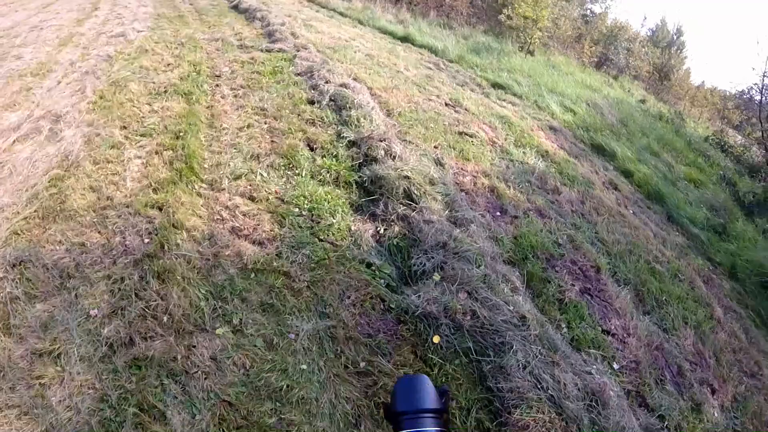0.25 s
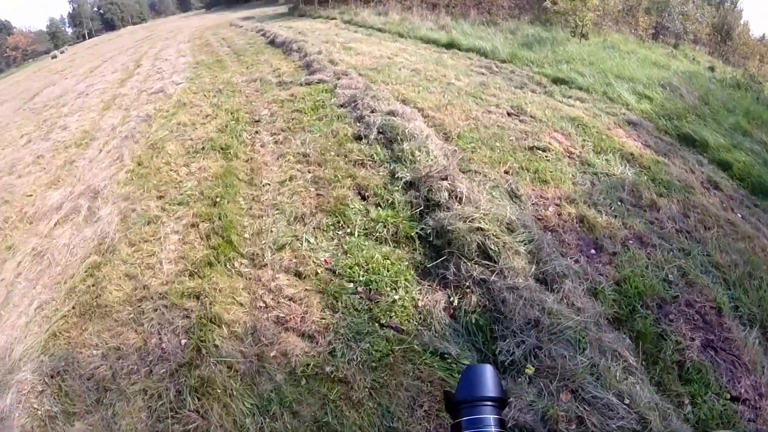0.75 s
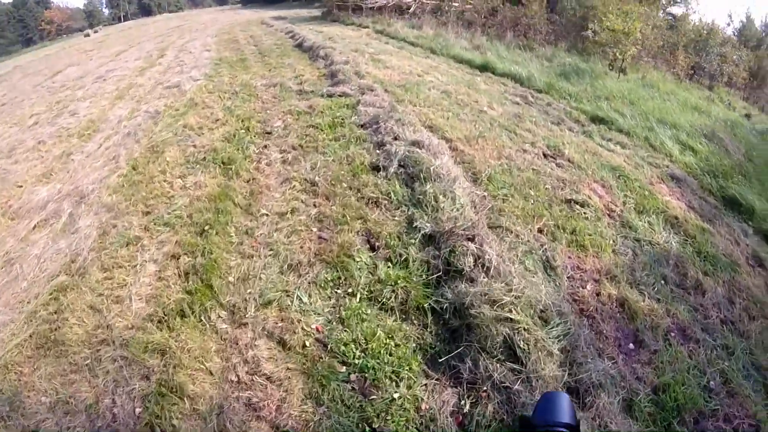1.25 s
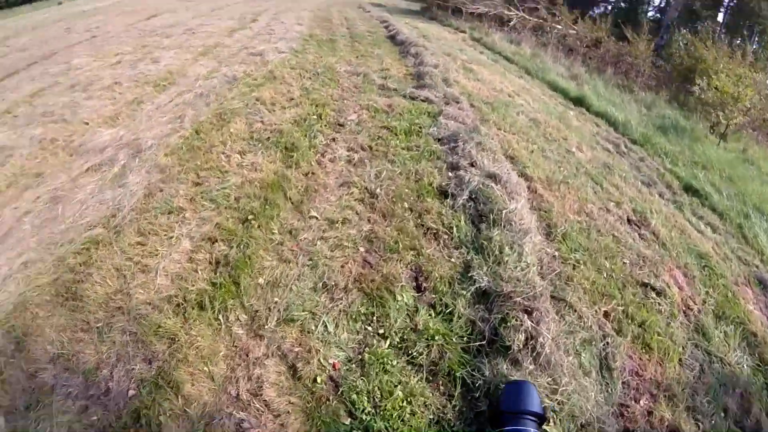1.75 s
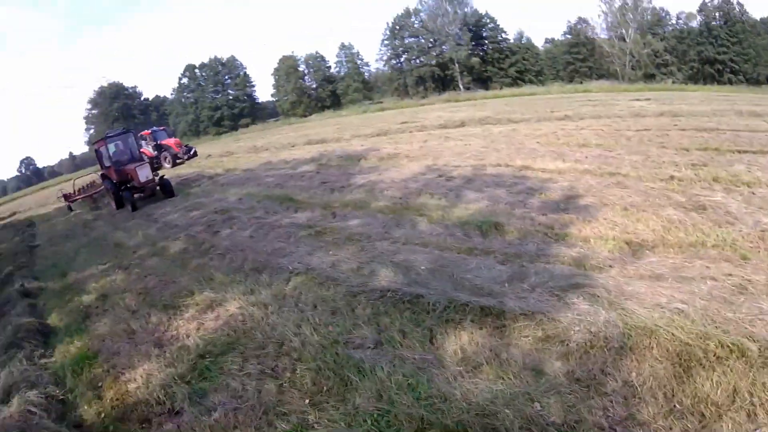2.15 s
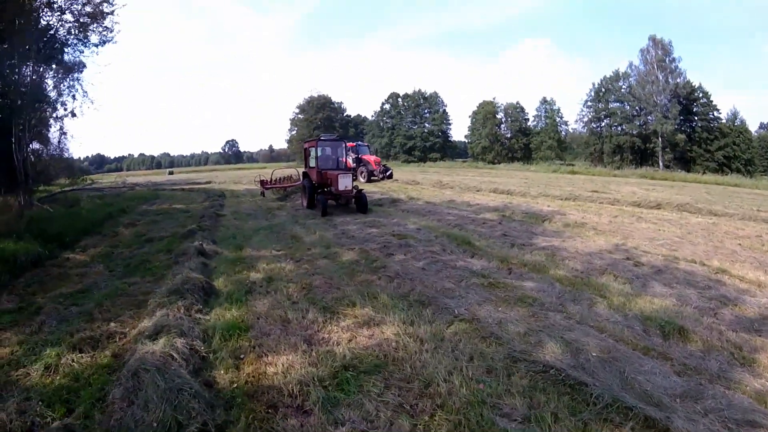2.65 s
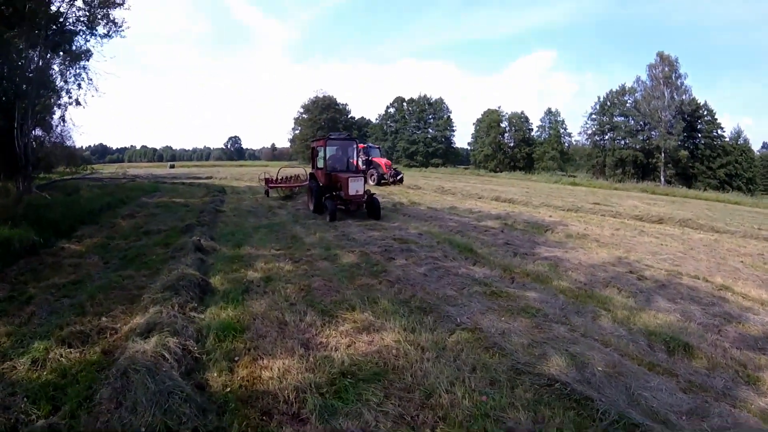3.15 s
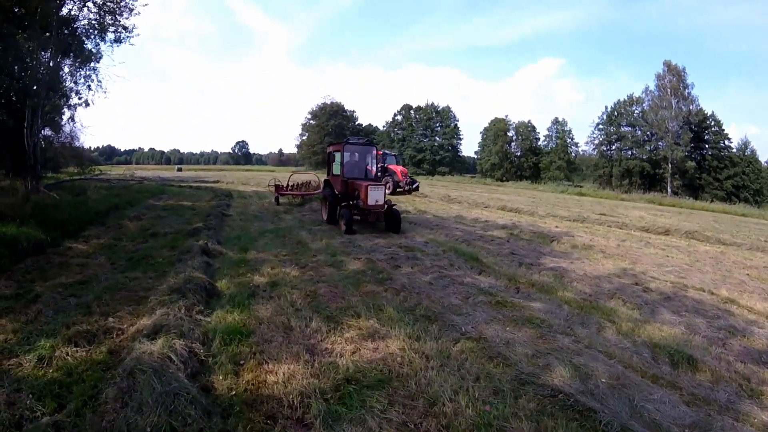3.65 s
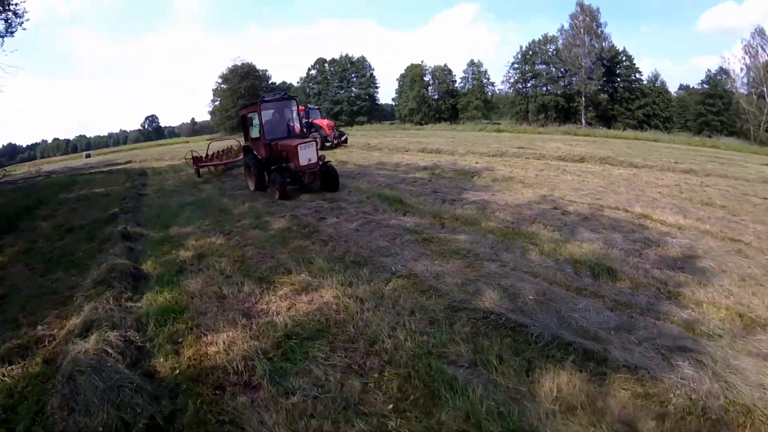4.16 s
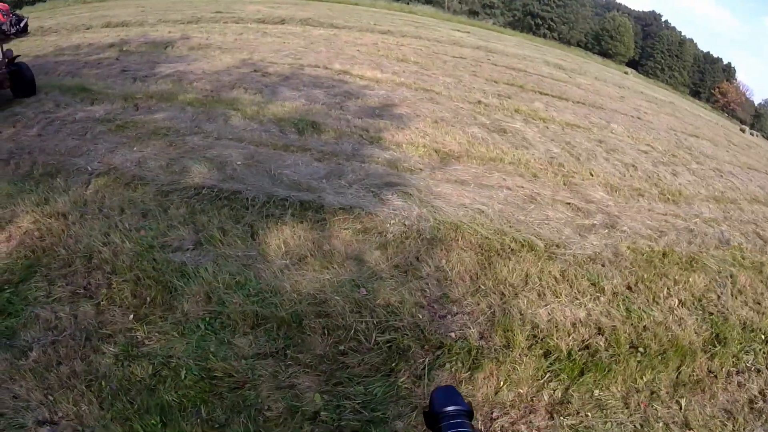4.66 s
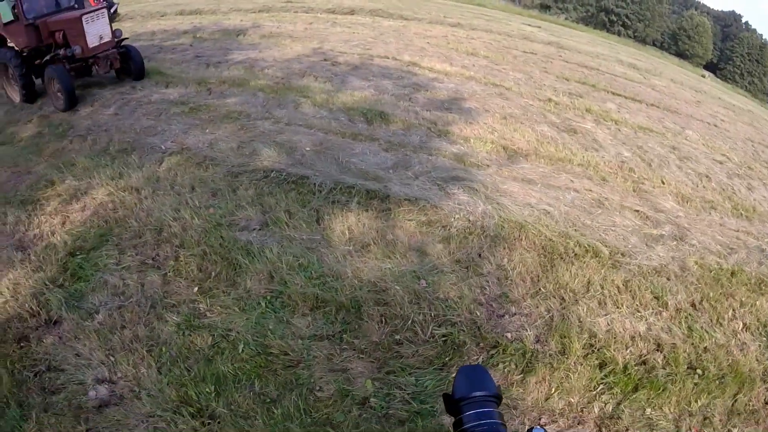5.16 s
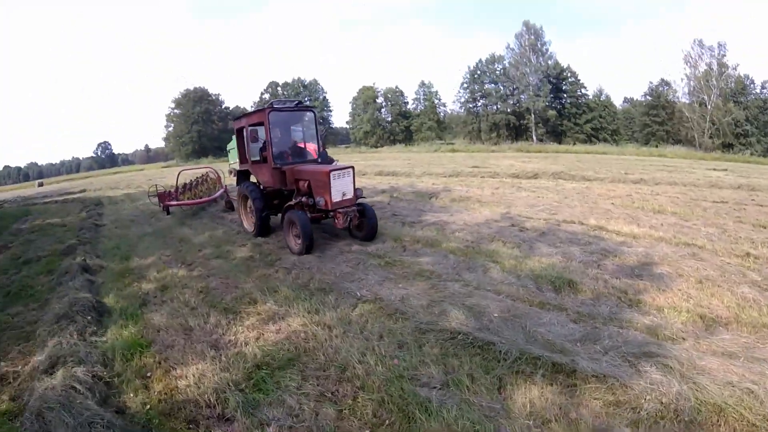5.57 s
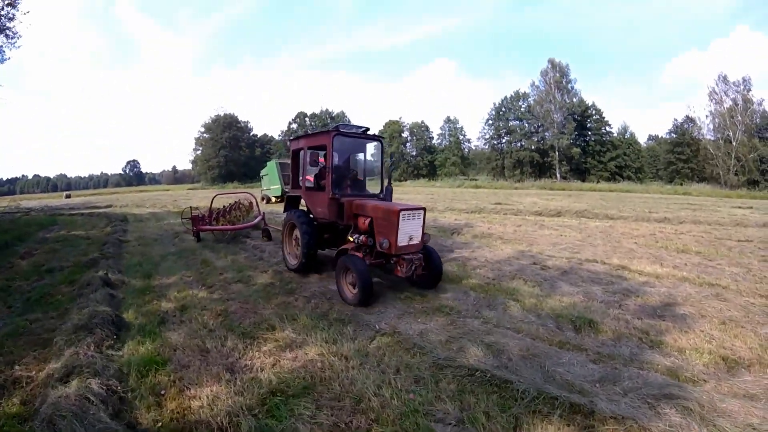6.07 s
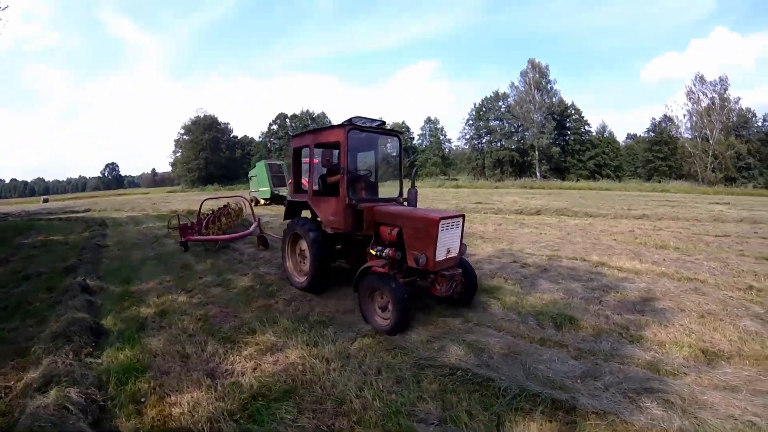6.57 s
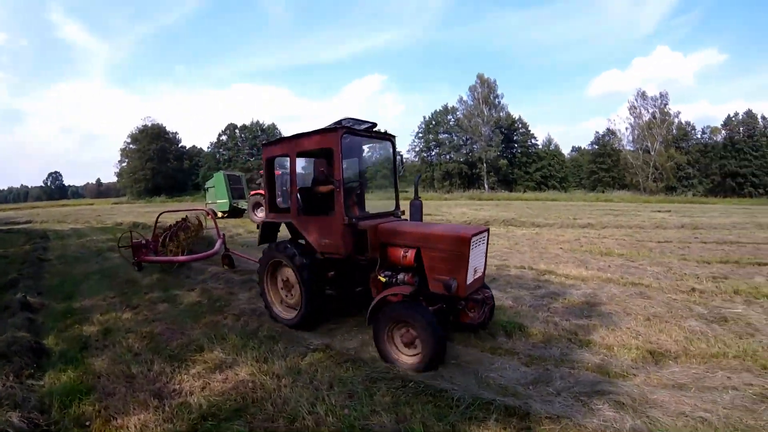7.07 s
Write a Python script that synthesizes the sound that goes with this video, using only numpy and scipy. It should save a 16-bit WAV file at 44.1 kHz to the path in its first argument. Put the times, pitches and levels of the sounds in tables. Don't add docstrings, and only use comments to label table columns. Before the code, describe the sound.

Lumpy, rattling diesel chug grows louder in an open hayfield, under low wind thumps and a few faint hisses of raked hay.

```python
import sys
import numpy as np
from scipy import signal
from scipy.fft import rfft, irfft, next_fast_len
from scipy.io import wavfile
from scipy.ndimage import uniform_filter1d

SR = 44100
rng = np.random.default_rng(int(sys.argv[2]) if len(sys.argv) > 2 else 0)


def to_wav(sig):
    pcm = np.clip(np.atleast_2d(sig), -1, 1) * 32767
    pcm = np.round(pcm).astype(np.int16)
    wavfile.write(sys.argv[1], SR, pcm.T)


def how_loud(loudness_db):
    steps = np.asarray(loudness_db, float) / 20
    return 10 ** steps


N = 322795

# pitch_hz, width_hz, level_db
BLOCK_MODES = [(657, 665, -6.5), (774.5, 39, 6), (793, 160, 3), (1045, 450, -7.5)]
# pitch_hz, width_hz, level_db
HEAD_MODES = [(800, 238, -8.5), (1042, 124, 2), (1138.5, 186, -1.5), (1350, 164, -8.5), (1496, 290, -19.5)]
# pitch_hz, density_db
PANEL_SPECTRUM = [(1200, -13.5), (1400, -8), (1600, -4), (2000, -3.5), (2350, -3.5), (2720, -9), (3100, -7),
                  (3600, -7), (4000, -10.5), (4350, -18.5), (4800, -36.5)]
# pitch_hz, density_db
TICK_SPECTRUM = [(4300, -6.5), (4900, -6), (5450, -2), (5900, 0), (6400, -3.5), (7000, -1.5), (7600, -8.5),
                 (8500, -8.5), (10000, -12), (13000, -14), (14700, -22.5)]
# place_in_cycle (0-1), level_db
EXHAUST_BLOWS = [
    (0.041, 10.5),
    (0.272, 21.5),
    (0.512, -3),
    (.77, -20),
]
# pitch_hz, width_hz, level_db
PIPE_MODES = [(38, 21.7, 5.5), (76, 9.8, 8.5), (113.4, 7.7, -3), (154, 120, -19.5)]
# time_s, level_db
EXHAUST_LEVEL = [(0, -24), (2, -34), (3.5, -23), (5, -48), (7.32, -36)]


def engine():
    block_db, panel_db, tick_db = heard_db()
    steep = signal.butter(3, [420, 1480], "band", fs=SR, output="sos")

    chatter = clatter(2, 0.00074, 0.0044, 0.039, 0.063, 2.1, 900, hard_db=-27, snap=0)
    whirr = ring(signal.sosfilt(steep, chatter), BLOCK_MODES)
    knock = clatter(1, .005, .007, .05, .3, 1.6, 900, hard_db=-9, snap=8)
    head = ring(signal.sosfilt(steep, knock), HEAD_MODES)
    block = evened(whirr + how_loud(-2.0) * head)

    rattle = clatter(2, .005, .008, .05, .4, 3.0, 2000, hard_db=-14, snap=3)
    ticks = clatter(3, .006, .008, .04, .35, 3.0, 3500, hard_db=-16, snap=1)
    exhaust = ring(strikes(*np.transpose(EXHAUST_BLOWS), spread_db=1.5, jitter_s=.0012), PIPE_MODES)
    exhaust = exhaust * how_loud(columns(EXHAUST_LEVEL)[0])

    sound = how_loud(block_db) * block
    sound = sound + how_loud(panel_db) * colour(rattle, PANEL_SPECTRUM)
    sound = sound + how_loud(tick_db - 0.04) * colour(ticks, TICK_SPECTRUM)
    return sound + exhaust


# place_in_cycle (0-1), knock_db, rattle_db, tick_db
FIRING_STROKES = [
    (-.09, 11.5, 3, 2),
    (.18, 7.5, 3, 6),
    (.44, -4, -9, -6),
]
# time_s, level_db, sharpness_db
HARD_KNOCKS = [(0.149, -29, 12), (2.625, -10.5, -21), (3.189, -6, -10), (3.866, -17.5, -5),
               (4.201, -8.5, -1.5), (4.317, 0, -8), (4.541, -1.5, -7), (4.652, -10, 3), (4.875, -0.5, -0.5),
               (5.423, -5, -3.5), (5.97, -4.5, -8.5), (6.085, -7, -7.5), (6.306, -6.5, -5),
               (6.41, -27.5, -4), (6.505, -19, 2), (6.617, -2, -4), (6.718, -3.5, -5), (6.755, -18.5, 11),
               (6.826, -11, -3.5), (7.028, -1, 3), (7.145, -2.5, -5), (7.287, -20.5, -8)]
# level_db against the knock, share of sharpness
HARD_SHARES = [(3, 0.0), (-18, 1.0), (-32.5, 0.12)]


def clatter(layer, rise_s, quick_s, slow_s, slow_share, grain_db, grains_per_s, hard_db, snap):
    t = np.arange(SR // 4) / SR
    decay = np.exp(-t / quick_s) + slow_share * np.exp(-t / slow_s)
    flare = (1 - np.exp(-t / rise_s)) * decay

    firings = np.transpose(FIRING_STROKES)
    hits = strikes(firings[0], firings[layer], spread_db=3.5, jitter_s=.0015)
    level_db = heard_db()[layer - 1]
    s, db, sharp_db = np.transpose(HARD_KNOCKS)
    part_db, share = HARD_SHARES[layer - 1]
    hard = ((s - .005) * SR).astype(int)
    hits[hard] += how_loud(db + part_db + share * sharp_db - level_db[hard] + hard_db)

    shape = 1 + signal.oaconvolve(hits, flare)[:N]
    struck = rng.random(N) < grains_per_s / SR
    grains = struck * rng.standard_normal(N) * how_loud(grain_db * rng.exponential(1, N).clip(0, 3))
    blow = snap * np.roll(hits, round(rise_s * SR))
    return shape * (rng.standard_normal(N) + 0.62 * evened(grains)) + blow


# time_s, speed_cycles_per_s
CRANK_SPEED = [(0, 9.487), (.7, 9.27), (1.4, 8.572), (2, 8.681), (3, 8.819), (4.2, 8.913), (5.4, 9.088),
               (6.2, 9.238), (7.32, 9.548)]
LUCK = rng.standard_normal((4, 70, 2))


def strikes(places, dbs, spread_db, jitter_s):
    s = np.arange(N) / SR
    turned = -1.45 + np.cumsum(columns(CRANK_SPEED)[0]) / SR
    out = np.zeros(N)
    for place, db, luck in zip(places, dbs, LUCK):
        at = np.interp(np.arange(70) - 2 + place, turned, s, -1, 99) + jitter_s * luck[:, 0]
        inside = (at > 0) & (at < (N - 1) / SR)
        out[(at[inside] * SR).astype(int)] += how_loud(db + spread_db * luck[inside, 1])
    return out


# time_s, loudness_db, treble_brightness_db
APPROACH = [(0, -31.5, 0.5), (.35, -32, -2), (1.35, -31.5, 0), (2.05, -32.5, 0.5), (2.4, -28.5, -3),
            (2.75, -26, -3.5), (3.45, -25, -3.5), (4.15, -25.5, -3.5), (4.85, -26.5, -2.5), (5.55, -25, -3),
            (5.85, -30, -2), (6.25, -24.5, -3), (6.6, -21.5, -2), (7.32, -25.5, 0.5)]
# level_db at mean loudness, share of loudness, share of brightness
PART_LEVELS = [(-26.5, 0.89, 0.17), (-43.5, 0.68, 1.6), (-50, 0.53, 0.62)]


def heard_db():
    loud_db, bright_db = columns(APPROACH)
    mean_db = -27
    return [db + share * (loud_db - mean_db) + bright_share * bright_db for db, share, bright_share in PART_LEVELS]


# start_s, level_db, t60_s
RAKE_SWISHES = [
    (3.053, -38, 0.49),
    (3.111, -50, 0.32),
    (4.2, -50, 0.81),
    (4.341, -44, 0.13),
    (4.9, -38.5, 0.081),
    (5.232, -42.5, 0.12),
]
# pitch_hz, density_db
HAY_SPECTRUM = [(1940, -25), (3300, -20), (3980, -8), (4450, -23), (4700, -16), (6130, -7.5), (7090, -12),
                (8420, -18.5), (10900, -39), (18500, -120)]


def rake():
    t = np.arange(N) / SR
    level = np.zeros(N)
    for s, db, t60 in RAKE_SWISHES:
        onset = ((t - s) / 0.0011).clip(0, 1)
        level += how_loud(db - 60 * (t - s).clip(0) / t60) * onset
    return level * how_loud(2.2 * flutter(60)) * colour(rng.standard_normal(N), HAY_SPECTRUM)


# pitch_hz, density_db
RUMBLE_SPECTRUM = [(8, 11), (20, -0.5), (40, 10), (65, 0.5), (90, -21), (130, -52)]
# pitch_hz, density_db
BUFFET_SPECTRUM = [(40, -43), (62, 0), (85, 1.5), (120, -3.5), (180, -11.5), (240, -23), (320, -52)]
# pitch_hz, density_db
ROAR_SPECTRUM = [(130, -9), (185, 1), (230, 0.5), (330, -2.5), (480, -7), (620, -11), (900, -28)]


def wind():
    spectra = (RUMBLE_SPECTRUM, BUFFET_SPECTRUM, ROAR_SPECTRUM)
    gusts = zip(gust_db(), spectra, (.5, .8, 1.1), (.06, .04, .03))
    lumps = flutter(13.0)
    air = np.zeros(N)
    for db, spectrum, lump_db, span_s in gusts:
        eddies = steadied(colour(rng.standard_normal(N), spectrum), span_s)
        air += how_loud(db + lump_db * lumps) * eddies
    return air + .3 * (air ** 2 - uniform_filter1d(air ** 2, 4000))


# time_s, level_db, reach_db (how far the eddies climb in pitch)
BREEZE = [(0, -13.5, -7.5), (.2, -23, 0), (.55, -23.5, 5.5), (.95, -20.5, -4), (1.35, -25, 1),
          (1.65, -18.5, -0.5), (2.05, -26.5, 2.5), (2.14, -16, 4.5), (2.45, -19.5, 4), (3.2, -15.5, 1),
          (3.95, -23, 3), (4.4, -17, 4.5), (4.85, -17.5, 3.5), (5.25, -17, 4), (5.9, -18.5, 5),
          (6.4, -17, 7), (6.7, -15, 7), (7.25, -16.5, 10)]
# time_s, level_db, length_s, reach_db
SINGLE_GUSTS = [(0.031, -21, 0.023, 13), (0.07, -0.5, 0.016, 1.5), (0.12, -10, 0.053, 10.5),
                (1.03, 8, .02, 1), (1.175, 5.5, 0.028, -3), (1.77, 5.5, 0.015, -11), (2.09, 6, 0.036, -10),
                (2.305, 1.5, 0.11, 4), (2.764, 2, .03, -0.5), (2.844, -4.5, 0.044, 2),
                (2.963, 3.5, 0.041, -1.5), (4.153, 8, 0.017, -7), (4.228, 7.5, 0.0067, -1.5),
                (4.43, 2.5, 0.12, -3), (4.98, 7, 0.054, 1), (5.413, 3, 0.11, 5.5), (5.724, 9, 0.077, -1.5),
                (6.637, -0.5, 0.062, 2.5), (7.32, 2.5, 0.053, 4)]
# level_db over the breeze, share of reach
EDDY_LEVELS = [(0, -0.41), (-5, 0.44), (-18, 1.09)]


def gust_db():
    t = np.arange(N) / SR
    level_db, reach_db = columns(BREEZE)
    for s, db, length, reach in SINGLE_GUSTS:
        bump = np.exp(-((t - s) / length) ** 2)
        level_db, reach_db = level_db + db * bump, reach_db + reach * bump
    return [level_db + db + share * reach_db + 2.5 * flutter(9.1) for db, share in EDDY_LEVELS]


def steadied(x, span_s):
    return evened(x / (uniform_filter1d(x ** 2, int(span_s * SR)) + 0.055) ** 0.33)


def evened(x):
    return x / np.sqrt(np.mean(x ** 2) + 1e-20)


def columns(rows):
    s, *values = np.transpose(rows)
    return [np.interp(np.arange(N) / SR, s, v) for v in values]


def across(points, size):
    hz, value = np.transpose(points)
    return np.interp(np.log(np.fft.rfftfreq(size, 1 / SR) + 1), np.log(hz + 1), value)


def colour(x, points):
    closed = [(points[0][0] * .8, -90)] + list(points) + [(points[-1][0] * 1.2, -90)]
    size = next_fast_len(N)
    return evened(irfft(rfft(x, size) * how_loud(across(closed, size)), size)[:N])


def ring(x, modes):
    out = np.zeros(N)
    for k, (hz, width, db) in enumerate(modes):
        pole = np.exp((2j * np.pi * hz - np.pi * width) / SR)
        out += (-1) ** k * how_loud(db) * signal.lfilter([1 - abs(pole)], [1, -pole], x).real
    return evened(out)


def flutter(hz):
    return evened(signal.lfilter(*signal.butter(2, hz, fs=SR), rng.standard_normal(N)))


# pitch_hz, share
PORT_LEAN = [(100, 0.094), (250, 0.2), (530, 0.6), (900, 1.35), (1600, 1.7), (4600, 2.0), (9000, 1.5)]


def scene():
    mid = engine() + wind() + rake()
    size = next_fast_len(N)
    lean = irfft(rfft(mid, size) * across(PORT_LEAN, size), size)[:N]
    side = lean * np.tanh(-0.87 * np.log(10) / 40)
    return np.array([mid + side, mid - side])


# pitch_hz, level_db, share of the limit's unrest
TREBLE_LIMIT = [(2000, -39, 0.18), (3000, -26, 0.44), (4080, -29.5, 1), (6200, -28.5, 1), (6400, -33, 0.98),
                (8330, -17, 0.69), (8700, -16.5, 0.76), (11200, -15.5, 0.95), (15000, -17, 0.99)]
# centre_s, length_s, limit_shift_db
THIN_SPELLS = [(0.037, .06, -2), (.37, .05, -10), (.56, .05, 10), (.965, .03, 18), (1.62, .12, 6),
               (2.033, .05, -8), (2.2, .04, 16), (2.856, .07, -5), (2.96, .05, 15), (3.275, .05, 13),
               (3.45, .03, 13), (3.542, .024, 10), (4.41, .05, 19), (4.505, .05, 19), (4.57, .04, -12),
               (4.715, .05, 13), (4.776, .06, -11), (4.905, .04, -18), (5.168, .04, 22.5), (5.218, .04, -9),
               (5.31, .07, 9), (5.48, .05, 17), (5.619, .16, -10), (5.725, .024, 12), (5.782, .04, -8),
               (5.84, .07, 16), (6.05, .024, 13), (6.11, .04, -11), (6.39, .05, 17), (6.767, .04, -14)]
# pitch_hz, odds_sigma
SIDE_SURVIVAL = [(150, -1.5), (450, 1.0), (1000, 3), (2200, 0.5), (3600, .2), (4500, -.6), (6000, 0.3),
                 (8000, -1.3)]


def thin_treble(x):
    window = np.sin(np.pi / 2 * np.sin(np.pi * (np.arange(2048) + .5) / 2048) ** 2)
    lead = 2048 - 559
    hz, t, z = signal.stft(np.pad(x, ((0, 0), (lead, 0))), SR, window, 2048, 1024, boundary=None)
    t, power = t - lead / SR, abs(z.mean(0)) ** 2

    limit_hz, *values = np.transpose(TREBLE_LIMIT)
    keep_db, share = (np.interp(hz, limit_hz, v)[:, None] for v in values)
    loud_db = 10 * np.log10(power.sum(0) + 1e-9)
    restless_db = 3.4 * rng.standard_normal(len(t)) + 0.59 * (loud_db + 22.5)
    per_band_db = 5.7 * np.repeat(rng.standard_normal((len(t), 43)).T, 24, 0)[:len(hz)]
    short_db = sum(db * (abs(t - s) < length / 2) for s, length, db in THIN_SPELLS)

    mid_db, low_db = (10 * np.log10(power[(hz > lo) & (hz < hi)].sum(0) + 1e-9)
                      for lo, hi in ((600, 4000), (10, 300)))
    flare_db, blown_db = (v - uniform_filter1d(v, size=15) for v in (mid_db, low_db))
    short_db = short_db - 1.3 * flare_db + .4 * blown_db

    stutter_from_s, stutter_to_s, stutter_db = 2.237, 2.8, 12.5
    turn = np.round((t - stutter_from_s) * SR / 1024) % 3 != 0
    short_db = short_db + stutter_db * (turn & (t > stutter_from_s - .01) & (t < stutter_to_s))

    rich_db = -0.1 * flare_db - 0.5
    limit_db = keep_db - 62.5 + share * (restless_db + per_band_db + short_db)
    limit_db = limit_db - rich_db * (hz[:, None] > 7400)
    line_db = 10 * np.log10(uniform_filter1d(power, size=2, axis=0) + 1e-20)
    mid = z.mean(0) * ((line_db > limit_db) | (hz[:, None] < 2400))

    whim = rng.standard_normal((len(t), 65))
    whim = evened(uniform_filter1d(whim, size=2, axis=0) + 0.7 * whim[:, :1])
    odds = across(SIDE_SURVIVAL, size=2048)[:, None] > np.repeat(whim.T, 16, 0)[:len(hz)]
    side = (z[0] - z[1]) / 2 * odds * (mid != 0)
    both = np.array([mid + side, mid - side])
    return signal.istft(both, SR, window, 2048, 1024, boundary=False)[1][:, lead:lead + N]


def low_pass(x):
    return signal.sosfilt(signal.butter(12, 14780, fs=SR, output="sos"), x)


def record(dry):
    t = np.arange(N) / SR
    dropout_s, rise_s = 6.9585, 0.028
    fade = np.where(t < dropout_s, 1, ((t - dropout_s) / rise_s).clip(.22, 1))
    held = .95 * np.tanh(dry * fade / .9)
    mix = thin_treble(held)
    return low_pass(mix)


dry = scene()
out = record(dry)
to_wav(out)
```